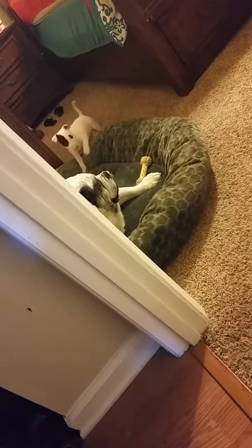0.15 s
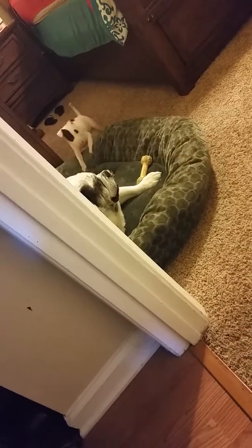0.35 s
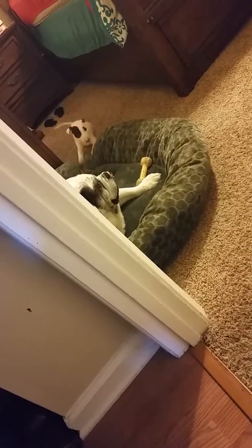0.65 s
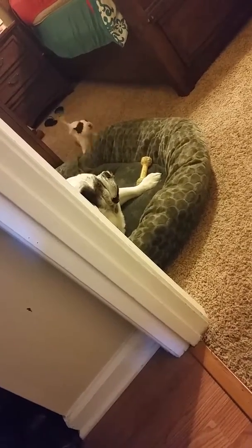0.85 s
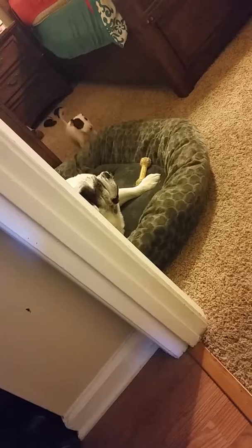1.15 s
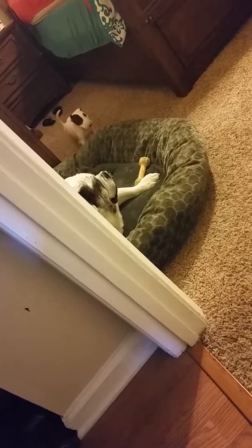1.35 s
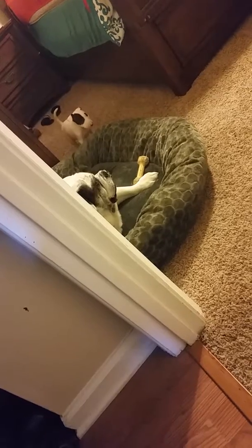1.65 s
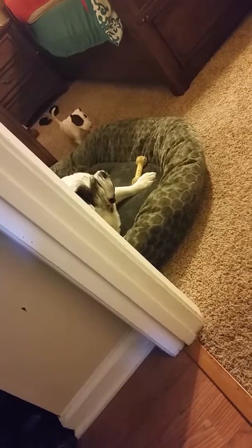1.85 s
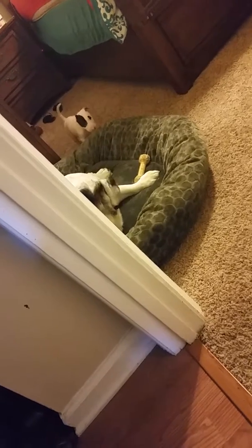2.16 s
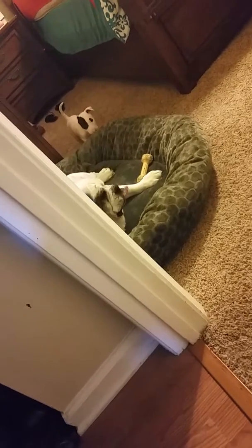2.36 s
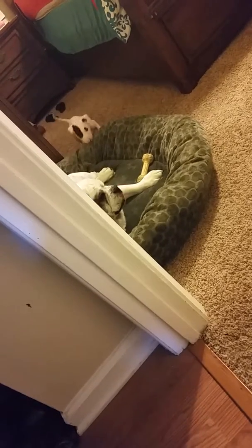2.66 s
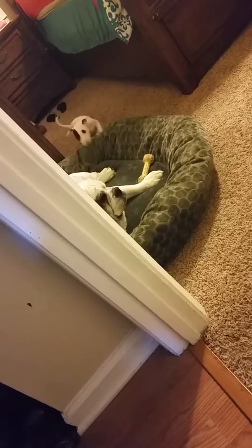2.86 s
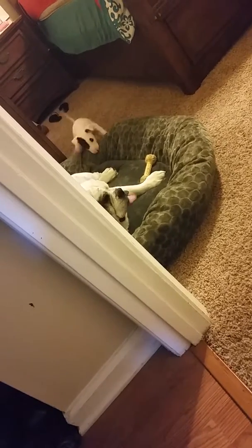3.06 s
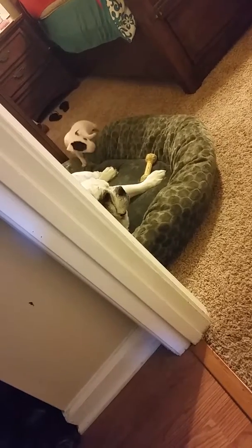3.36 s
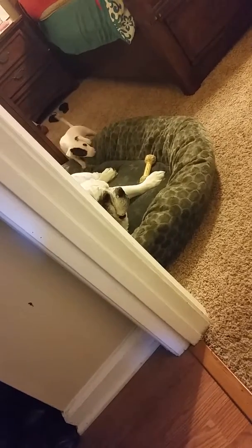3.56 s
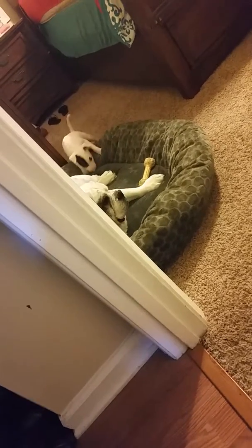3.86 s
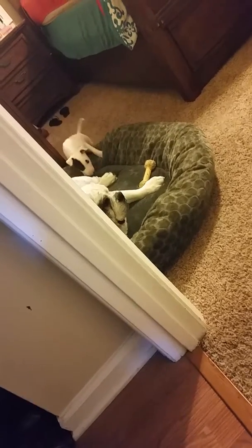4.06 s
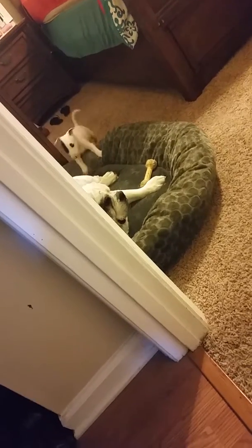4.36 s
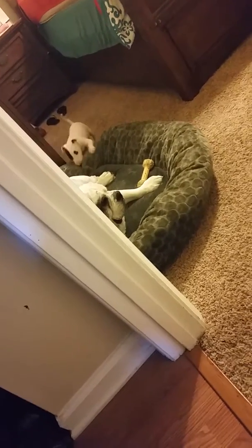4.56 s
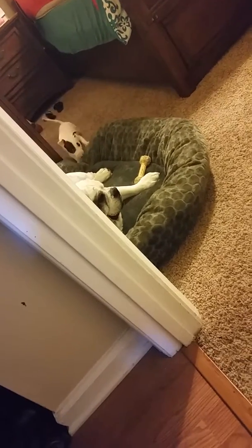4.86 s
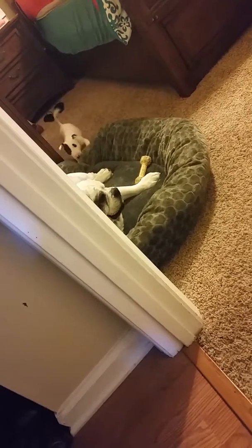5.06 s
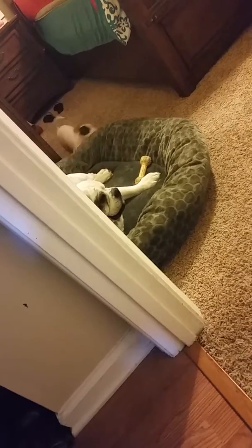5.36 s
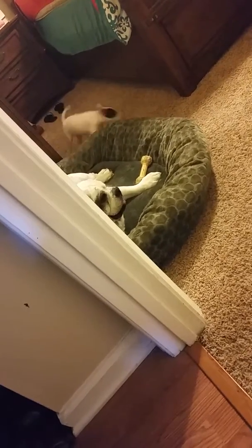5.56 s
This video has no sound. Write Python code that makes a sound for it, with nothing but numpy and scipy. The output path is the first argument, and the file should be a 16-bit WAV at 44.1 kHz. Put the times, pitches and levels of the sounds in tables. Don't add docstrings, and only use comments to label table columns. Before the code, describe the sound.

Inside a carpeted room, heard by phone from the doorway: a big dog's deep, rattling growl, strongest at first, thinning in the middle and rising again later. A puppy adds fluttering grumbles, toothy breath puffs, faint nose whistles and four brief yaps, the first brightest and highest. Soft paw thumps and knocks scatter through. Low house rumble and uneven hiss lie beneath; a hard woof begins as it stops.

```python
import sys
import numpy as np
from scipy import signal
from scipy.fft import rfft, irfft, next_fast_len
from scipy.io import wavfile
from scipy.ndimage import uniform_filter1d, map_coordinates

SR = 44100
rng = np.random.default_rng(int(sys.argv[2]) if len(sys.argv) > 2 else 0)


def volts_from_db(level):
    exponent = np.asarray(level, float) / 20
    return 10 ** exponent


def master(y):
    cut = np.clip(np.atleast_2d(y).T, -1, 1)
    pcm = np.round(cut * 32767)
    wavfile.write(sys.argv[1], SR, pcm.astype(np.int16))


N = 252428
TIME = np.arange(N) / SR
COARSE = 32

# (start [s], hold [s], effort [dB],
# mouth opening [dB])
GROWLS = [(0, 0.67, -34, -8.5), (.68, 0.19, -37, -5), (.95, 0.214, -46, 4.5), (1.17, 0.142, -62, 22.5),
          (1.5, 1, -57, -19), (2.12, 0.23, -39, -36), (2.4, 0.47, -47.5, -31), (2.7, 0.21, -49, -19),
          (2.95, 0.027, -48, 15.5), (3.25, 0.064, -64, 9), (3.55, 0.099, -62, -14.5),
          (3.85, 0.18, -53, -15.5), (4.17, 0.009, -37.5, -32.5), (4.32, 0.42, -36, -28),
          (4.62, 0.13, -37, -15), (4.85, 0.027, -29.5, -1.1), (5.0, 0.05, -37.5, -5),
          (5.19, 0.029, -41.5, 6), (5.3, 0.19, -34.5, -4), (5.5, 0.095, -41.5, -7.5),
          (5.64, 0.028, -41, -5.5)]
GROWL_RISE_DB_S, GROWL_SAG_DB_S, GROWL_FALL_DB_S = 199.5, -1.5, 180
# (time [s], fold rate [Hz], chest ring [dB])
GROWL_PITCH = [(0, 93.74, -2), (.7, 93.73, -0.5), (2.05, 95.85, 0.5), (2.25, 88.03, 2.5),
               (2.47, 85.92, -3.5), (2.55, 98.38, -3), (4.1, 107.8, 1.5), (4.35, 97.24, -1),
               (4.75, 97.13, -6), (5.05, 96.4, 7), (5.15, 95.5, 4), (5.55, 95.78, -6), (5.72, 98.4, 13)]
# (time [s], jitter [share])
FOLD_JITTER = [(0, .04), (.65, .04), (.75, .09), (2.0, .04), (2.45, .04), (2.6, .12), (5.72, .16)]
# (centre [Hz], width [Hz], level [dB])
CHEST_MODES = [(95, 34, 0)]
# (centre [Hz], width [Hz], level [dB])
THROAT_MODES = [(230, 15, 0), (345, 50, -27)]
# (centre [Hz], width [Hz], level [dB])
MOUTH_MODES = [(522, 70, -1.5), (625.7, 26, 2.5), (707, 96, -6), (1280, 86, -7.5), (1593, 92, -8),
               (2240, 420, -25)]
CHEST_BETWEEN_DB = -15
LIPS_PART_DB, THROAT_DB, THROAT_SHUT, THROAT_OPEN = -11, -11, 0.34, 1.326
# (first [s], last [s], period [s], first level [dB], last level [dB])
FLAP_RUNS = [(2.07, 2.218, 0.048, -47.5, -42.5), (2.272, 2.519, 0.061, -42, -61.5),
             (2.57, 2.715, 0.039, -40, -45.5), (2.797, 2.8, .05, -37.5, -51),
             (3.647, 3.75, 0.056, -50, -52), (3.825, 3.859, 0.045, -57.5, -54),
             (3.963, 4.041, 0.074, -46, -57)]
FLAP_SCATTER_DB, FLAP_SCATTER_S = 1.3, .003
# (time [s], peak [dB])
SINGLE_FLAPS = [(-.002, -27.5), (.051, -28.5), (.103, -26.5), (.155, -26), (.212, -31.5), (.265, -29),
                (.32, -29.5), (.367, -29), (.431, -30.5), (.48, -29), (.542, -28), (.59, -30), (.65, -29.5),
                (0.732, -35), (.78, -31), (4.093, -46), (4.152, -39.5), (4.265, -38), (4.318, -35.5),
                (4.361, -35), (4.412, -38), (4.453, -36), (4.497, -36.5), (4.552, -36.5), (4.598, -38.5),
                (4.644, -32.5), (4.678, -48), (4.711, -34.5), (4.78, -35.5)]
# (time [s], swell width [s], kick [dB])
FLAP_SHAPE = [(0, 0.022, -10), (.7, 0.016, -14), (2.4, 0.017, -7.5), (2.7, 0.0061, -11), (4, 0.0061, 1),
              (5.72, 0.0043, -10.5)]
# (time [s], peak [dB])
SMACKS = [(.14, -59.5), (0.171, -40.5), (0.224, -45.5), (0.3191, -42), (0.361, -46.5), (.434, -46),
          (0.458, -44), (.495, -44), (.507, -48), (.5307, -38.5), (0.569, -48.5), (.589, -37), (0.643, -46),
          (0.72, -47), (.771, -45)]
# (centre [Hz], width [Hz], level [dB])
SMACK_MODES = [(600, 58, 9), (1280, 70, 1), (1600, 80, -2), (2170, 95, -6.5)]
# (time [s], level [dB])
WOOF_SLAPS = [
    (5.6978, -26),
    (5.7052, -30),
    (5.7083, -19),
    (5.712, -20),
    (5.7155, -8),
    (5.7197, -4),
    (5.7231, -6),
]
# (centre [Hz], width [Hz], level [dB])
WOOF_MODES = [(168, 65, 5), (480, 20, -1.5), (908, 250, 4.5), (1800, 123, 11), (3970, 270, -15.5),
              (9200, 2600, -12.5)]

# (time [s], pitch [Hz], level [dB], noise share [0-1])
YAP_1 = [(.836, 1154, -32, 1), (.85, 1249, -14.5, 0.83), (.875, 1280, -19.5, 0.5), (.89, 1085, -19.5, 0.03),
         (.915, 914, -25.5, 0.25), (.95, 731, -29.5, .25), (.98, 611.5, -29.5, 0.5),
         (1.0, 545.5, -32.5, 0.15), (1.04, 481.5, -52.5, 0.2)]
# (time [s], pitch [Hz], level [dB], noise share [0-1])
YAP_1_DRONE = [(.823, 932, -56, .09), (.834, 945, -23, 0.0652), (.855, 1051, -26, 0.11),
               (.885, 1109, -16.5, 0.05), (.908, 1087, -15.5, .05), (.929, 1051, -15.5, .05),
               (.945, 1045, -28.5, 0.11), (.958, 1029, -45, 0.16)]
# (time [s], pitch [Hz], level [dB], noise share [0-1])
YAP_1_WHINE = [(.872, 1029, -41, 0.45), (.895, 1051, -36.5, .15), (.93, 1048, -31.5, 0.17),
               (.955, 1059, -34, .3), (1.0, 1080, -38, 0.5), (1.37, 1084, -59, 0.66)]
# (time [s], pitch [Hz], level [dB], noise share [0-1])
YAP_2 = [(2.866, 541.2, -74, .05), (2.874, 600, -62, 0.0394), (2.884, 740.2, -52, .04),
         (2.898, 883, -52.5, 0.028), (2.911, 980.6, -43, 0.059), (2.921, 1015, -29, .2),
         (2.932, 930, -29.5, .62), (2.952, 753.8, -31.5, 0.81), (2.98, 525, -34.5, .4),
         (3.03, 300, -61.5, 0.26)]
# (time [s], pitch [Hz], level [dB], noise share [0-1])
YAP_2_DRONE = [(2.915, 995.5, -39.5, 0.13), (2.935, 1019, -33.5, 0.32), (2.955, 989, -40.5, 0.18),
               (2.978, 1023, -36.5, 0.38), (2.99, 1058, -46, 0.39), (3.05, 1130, -57, 0.76)]
# (time [s], pitch [Hz], level [dB], noise share [0-1])
YAP_3 = [(4.778, 497.7, -55, 0.29), (4.802, 583.4, -32, 0.056), (4.813, 638, -25, 0.044),
         (4.838, 696.7, -23, .08), (4.847, 686.7, -21, .2), (4.856, 662, -27, 0.85), (4.9, 600, -34, 0.9),
         (4.935, 526, -63, 0.72)]
# (time [s], pitch [Hz], level [dB], noise share [0-1])
YAP_4 = [(5.15, 471.8, -52, 0.29), (5.172, 508.1, -49.5, 0.25), (5.195, 557.9, -45, 0.59),
         (5.215, 519, -27, 0.55), (5.235, 532.3, -31.5, .35), (5.26, 533, -36, .4),
         (5.28, 518, -43.5, 0.78), (5.31, 460, -65.5, 0.34)]
# (frequency [Hz], gain [dB])
JAWS_1 = [(200, -23), (350, -12.5), (700, -18.5), (1070, -2.5), (1390, -1), (1800, -10.5), (2150, -3),
          (2800, -17), (3400, -14), (3800, -4.5), (4300, -7), (4800, -17), (6230, -39), (10200, -49),
          (13500, -23.5), (15700, -32)]
# (frequency [Hz], gain [dB])
JAWS_1_CLOSING = [(200, -15.5), (350, -11.5), (700, -18), (1070, 1.5), (1390, -9), (1800, -9), (2180, -12),
                  (2550, -9.5), (2950, -9.5), (3380, -8), (3650, -19), (4300, -27.5), (5150, -23.5),
                  (6230, -38), (13500, -29.5), (15700, -35.5)]
# (frequency [Hz], gain [dB])
JAWS_2_OPENING = [(200, -25), (600, -5.5), (1000, -9), (1500, 2.5), (2000, -1), (2800, -2.5), (3400, -12),
                  (4050, 1), (4600, -10), (6000, -26.5), (10000, -34), (15700, -28)]
# (frequency [Hz], gain [dB])
JAWS_2 = [(200, -37.5), (500, -9.5), (750, -18), (1050, 9), (1300, 6), (1860, -10.5), (2300, -9),
          (2900, -5), (3400, -10), (4050, 0), (4500, -1), (5200, -20), (6000, -22.5), (10000, -29),
          (15700, -23.5)]
# (frequency [Hz], gain [dB])
JAWS_3_OPENING = [(260, -39), (560, -29), (840, -19), (1150, -8.5), (1350, 4), (1700, -9.5), (2250, -4),
                  (2500, -8), (2900, -23.5), (4240, -0.5), (5700, -32), (8520, -48), (15700, -44.5)]
# (frequency [Hz], gain [dB])
JAWS_3 = [(260, -42.5), (450, -27.5), (692, -14), (840, -39.5), (1000, -17), (1270, 4.5), (1410, 3),
          (1700, 15.5), (2050, -5), (2400, -6), (3800, 2), (4240, -19), (5700, -31), (7230, -42),
          (8520, -28), (15700, -37)]
# (frequency [Hz], gain [dB])
JAWS_4 = [(240, -32), (400, -4), (520, -9.5), (798, -50), (1020, -27), (1200, -9), (1620, 4.5),
          (1950, -7.5), (2300, -22), (2850, -15), (3400, -14), (3940, -10.5), (4600, -22), (5520, -41),
          (7050, -50), (8610, -23.5), (9440, -42), (15700, -38.5)]
# half-pitch share first, last; brightness [dB/octave] first, last; fraying
SLACK_1, SLACK_2, SLACK_3, SLACK_4 = (0, 3.5, 0, -1, 1), (0, 0.13, 1.9, -2, .4), (0.52, 8, -1.6, 3, 3.5), (1, 6, 2.5, -1, 4.5)
SLACK_DRONE_1, SLACK_WHINE_1 = (0, 0, 8, -7, 4), (0, 0, -1, -8.5, 8)
SLACK_DRONE_2 = (0, -3.5, 1, -5, 18)
DULLS_PER_DB = 0.46
FRAY_FROM_HZ = 2300
THROB_S, THROB_HZ, THROB_DEPTH = .89, 54, 0.78
YAP_WET_DB = [
    -3,
    -7,
    -6.5,
    -7.5,
]
# (start [s], hold [s], level [dB])
GRUMBLES = [(.03, 0.072, -39), (.215, 0.01, -37.5), (.36, 0.06, -44.5), (.5, 0.056, -40.5),
            (.72, 0.12, -41), (1.05, 0.3, -35.5), (1.55, 0.87, -67), (2.4, 0.12, -58), (2.6, .015, -48.5),
            (2.88, 0.086, -50), (3.02, 0.027, -41.5), (3.245, 0.055, -42), (3.66, 0.06, -57.5),
            (3.85, 0.025, -44), (4.16, 0.02, -44), (4.33, .04, -58), (4.58, 0.31, -44.5), (4.9, 0.038, -33),
            (5.0, 0.17, -45), (5.27, 0.11, -37), (5.455, 0.034, -34), (5.6, 0.015, -52.5),
            (5.715, 0.024, -33)]
GRUMBLE_RISE_DB_S, GRUMBLE_SAG_DB_S, GRUMBLE_FALL_DB_S = 251.5, 17.5, 332.5
# (centre [Hz], width [Hz], level [dB])
PUPPY_MODES = [(143, 43, 5), (257, 220, -3), (460, 120, -6.5), (652.4, 100, -50)]
# (start [s], hold [s], level [dB])
PUFFS = [(.03, 0.53, -75.5), (.67, 0.028, -63.5), (.875, 0.11, -41), (1.07, 0.25, -59.5),
         (2.775, 0.02, -79.5), (2.93, 0.024, -52.5), (3.25, 0.05, -73.5), (4.6, .2, -83.5),
         (4.86, .005, -48), (5.03, 0.15, -71.5), (5.23, 0.048, -60.5), (5.36, 0.12, -65.5),
         (5.72, .01, -59)]
PUFF_RISE_DB_S, PUFF_SAG_DB_S, PUFF_FALL_DB_S = 547, 26, 190.5
# (frequency [Hz], density [dB per Hz])
TEETH = [(1060, -29), (1800, -2), (2200, -6), (2470, -11.5), (2750, -9), (3650, -11), (4960, -5.5),
         (5680, -14), (6390, -8.5), (7190, -18.5), (8540, -6), (10600, -22.5), (13200, -8.5), (15700, -31)]
# (start [s], hold [s], level [dB], first pitch [Hz], last pitch [Hz])
WHISTLES = [(0.014, 0.33, -70.5, 8220, 8500), (0.414, 0.7, -76, 7400, 7450), (0.667, .1, -66, 8780, 9100),
            (0.967, .06, -47, 5397, 5104), (1.109, 0.18, -51.5, 5075, 4880),
            (1.128, 0.064, -56, 6540, 6510), (1.087, 0.27, -71, 8650, 8650),
            (3.237, 0.07, -74.5, 8630, 8600), (5.2, 0.058, -60.5, 8550, 8760),
            (5.355, .06, -59.5, 8700, 8550), (4.595, .08, -71, 2220, 2294)]
WHISTLE_RISE_DB_S, WHISTLE_SAG_DB_S, WHISTLE_FALL_DB_S, WHISTLE_BLUR_HZ = 502, 23, 248.5, 354
# (time [s],
# peak [dB], ring [Hz], T60 [s])
TAPS = [(-.0135, -14, 90, 0.053), (1.07, -26, 73.6, 0.055), (2.86, -47, 62.1, 0.15),
        (2.715, -21, 255.6, 0.0088), (3.692, -41, 223.4, 0.031), (4.141, -50, 332, 0.044),
        (4.181, -21, 417, 0.0079), (4.183, -21.5, 1091, 0.0019), (4.1825, -53, 1800, 0.0035),
        (4.704, -17.5, 294, 0.012), (4.848, -8, 99.7, 0.024), (5.17, -40, 1600, 0.025),
        (5.184, -41, 1660, 0.023), (5.193, -34, 1710, .025), (5.245, -47.5, 447, 0.21),
        (5.43, -30, 42.12, 0.062), (5.519, -54, 1840, 0.027), (5.565, -51.5, 1800, 0.032),
        (5.603, -53, 1810, 0.039), (5.661, -8.5, 95, 0.019), (5.664, -38.5, 1100, 0.019),
        (5.662, -31, 480, .012), (5.71, -22, 187, 0.065)]

# (frequency [Hz], T60 [s])
ROOM_T60 = [(100, 0.96), (1000, 0.4), (4000, 0.39), (12000, 0.45)]
# (frequency [Hz], left over right [dB])
PORTS = [(30, -1), (100, .6), (200, 3), (500, 4), (1100, 7.5), (2300, 10), (3200, 8), (4000, 30),
         (6000, 30), (9000, 12), (12000, 7), (15500, 3)]
# (frequency [Hz], density [dB per Hz])
HISS = [(210, -49), (350, -8), (600, -18.5), (950, -20.5), (1230, -11), (1500, -18.5), (2400, -36),
        (3300, -32), (4100, -17), (4700, -13), (5300, -28), (6100, -44), (11000, -39.5), (15500, -35.5)]
# (frequency [Hz], density [dB per Hz])
RUMBLE = [(12, -31.5), (20, -12.5), (27, -6), (45, 0), (114, 3.5), (147, -7.5), (387, -13), (437, -6),
          (500, -25), (650, -51), (1100, -120)]
# (frequency [Hz], left-right likeness [0-1])
AIR_ALIKE = [(30, 1), (80, .9), (300, 0.72), (1000, 0.0066)]
# (frequency [Hz], left over right [dB])
AIR_PORTS = [(60, -3), (110, 1), (200, 0), (380, 3), (700, -2.5), (1290, 8), (2380, -4.5), (4400, 26.5),
             (8120, 7.5), (15000, -2)]
HISS_DB, HISS_FOLLOWS, HISS_LAG_S = -48, 0.61, 0.21


def big_dog():
    breaths = pushes(GROWLS, GROWL_RISE_DB_S, GROWL_SAG_DB_S, GROWL_FALL_DB_S)
    steady = full(breaths.sum(axis=0))
    mouth_db = full(np.transpose(GROWLS)[3] @ breaths / breaths.sum(axis=0))
    opened_db = mouth_db - LIPS_PART_DB
    throat_db = THROAT_DB + np.maximum(-THROAT_SHUT * opened_db, THROAT_OPEN * opened_db)
    mouth_gain, throat_gain = volts_from_db(mouth_db), volts_from_db(throat_db)

    pitch_hz, chest_db = curves(GROWL_PITCH)
    clean = folds(pitch_hz, jitter=curves(FOLD_JITTER)[0], scatter_db=1, breath=.04)
    rough = folds(pitch_hz, jitter=.08, scatter_db=2.5, breath=.35)
    loose = folds(pitch_hz, jitter=.4, scatter_db=3, breath=.7)

    slaps = np.flatnonzero(clean > 8)
    swells, kicks = 0, np.zeros(N)
    for s, db in flaps():
        width_s, kick_db = curves(FLAP_SHAPE, s)
        onset_s = s - .008
        swells = swells + volts_from_db(db - 6) * np.exp(-((TIME[::COARSE] - onset_s) / width_s) ** 2)
        nearest = slaps[np.abs(slaps - onset_s * SR).argmin()]
        kicks[nearest] = volts_from_db(db + kick_db)
    swells = full(swells)

    effort = volts_from_db(-11) * steady + swells
    lagging = (effort + uniform_filter1d(effort, size=2400)) / 2
    mouth = voiced(rough, lagging * mouth_gain, MOUTH_MODES, 3000, .08 * kicks * mouth_gain)
    throat = voiced(loose, volts_from_db(-1.5) * effort * throat_gain, THROAT_MODES, 650, volts_from_db(4.5) * kicks * throat_gain)
    chest_gain = (volts_from_db(CHEST_BETWEEN_DB) * steady + swells) * volts_from_db(chest_db + 2.0)
    chest = voiced(clean, chest_gain, CHEST_MODES, 380, .7 * kicks)
    return chest + throat + mouth


def flaps():
    rows = []
    for first_s, last_s, period_s, first_db, last_db in FLAP_RUNS:
        for s in np.arange(first_s, last_s + period_s / 2, period_s):
            rows.append((s, np.interp(s, [first_s, last_s], [first_db, last_db])))
    scatter = rng.standard_normal((len(rows), 2)) * [FLAP_SCATTER_S, FLAP_SCATTER_DB]
    return np.vstack([rows + scatter, SINGLE_FLAPS])


def smacks():
    clicks = impulses(SMACKS, 41.0)
    return filtered(clicks, lambda f: modes(SMACK_MODES)(f) / (1 + 1j * f / 3500) ** 4)


def woof():
    slaps = -impulses(WOOF_SLAPS, 25.0)
    return filtered(slaps, lambda f: modes(WOOF_MODES)(f) / (1 + 1j * f / 2600) ** 2)


def yap(rows, jaws, slack, closing=None):
    closing = jaws if closing is None else closing
    half_first, half_last, bright_first, bright_last, fraying = slack
    a, b = round(rows[0][0] * SR), round(rows[-1][0] * SR)
    size = b - a
    pitch_hz, level_db, noise = curves(rows, TIME[a:b])
    pitch_hz = pitch_hz * (1 + .008 * wobble(150, size))
    done = np.linspace(0, 1, size)
    half = half_first + (half_last - half_first) * done ** 6
    bright_db = bright_first + (bright_last - bright_first) * done
    bright_db = bright_db - DULLS_PER_DB * (level_db.max() - level_db)

    k = np.arange(1, 61)[:, None] / 2
    hz = k * pitch_hz
    tilt_db = bright_db * np.log2(np.clip(hz / 1000, .5, 5))
    jaws_db = (1 - done) * along(jaws, hz) + done * along(closing, hz)
    gains = volts_from_db(jaws_db + tilt_db) * np.where(k % 1, half, 1)

    fray = fraying * np.clip(hz / FRAY_FROM_HZ - 1, 0, 2)
    blur = np.clip(2.3 * k, 0, 3) * noise + fray / (1 + fray)
    flutter = 1 / (1 + fray) + blur * np.array([wobble(400, size) for _ in k])
    turns = k * np.cumsum(pitch_hz) / SR + rng.random(k.shape)
    tone = np.sum(gains * flutter * np.sin(2 * np.pi * turns), axis=0)
    tone /= np.sqrt(np.sum(gains ** 2, axis=0) / 2 + 1e-9)

    hiss = rng.standard_normal(size)
    early, late = filtered(hiss, lambda f: volts_from_db([along(jaws, f), along(closing, f)]) * (f > 1020))
    rasp = (1 - done) * unit(early) + done * unit(late)
    out = np.zeros(N)
    out[a:b] = volts_from_db(level_db + 1.1 * wobble(90, size)) * ((1 - noise) * tone + noise * rasp)
    return out


def throb():
    since_s = TIME - THROB_S
    depth = THROB_DEPTH * np.clip((since_s + 0.015) / 0.025, 0, 1)
    return 1 + depth * np.cos(2 * np.pi * THROB_HZ * since_s)


def puppy_grumble():
    level = full(pushes(GRUMBLES, GRUMBLE_RISE_DB_S, GRUMBLE_SAG_DB_S, GRUMBLE_FALL_DB_S).sum(axis=0))
    drive = folds(158 + 6 * wobble(5), jitter=.1, scatter_db=3, breath=.3)
    return voiced(drive, level * volts_from_db(-1.5 + 3 * wobble(35)), PUPPY_MODES, 1300)


def panting():
    hiss = filtered(rng.standard_normal(N), lambda f: volts_from_db(along(TEETH, f)))
    level = full(pushes(PUFFS, PUFF_RISE_DB_S, PUFF_SAG_DB_S, PUFF_FALL_DB_S).sum(axis=0))
    return unit(hiss) * level * volts_from_db(3.4 * wobble(37))


def whistles():
    out = np.zeros(N)
    gains = pushes(WHISTLES, WHISTLE_RISE_DB_S, WHISTLE_SAG_DB_S, WHISTLE_FALL_DB_S)
    for (s, hold_s, _, first_hz, last_hz), gain in zip(WHISTLES, gains):
        pitch_hz = np.interp(TIME, [s, s + hold_s], [first_hz, last_hz])
        blur = np.resize(wobble(WHISTLE_BLUR_HZ, size=SR), N)
        out += full(gain) * blur * np.sin(2 * np.pi * np.cumsum(pitch_hz) / SR)
    return out


def taps():
    out = np.zeros(N + 2 * SR)
    after = TIME[:SR // 4]
    for s, db, hz, t60 in TAPS:
        rise = (1 - np.exp(-hz * after)) ** 2
        start = round((s + 1) * SR)
        out[start:start + len(after)] += volts_from_db(db + 11.5 - 60 * after / t60) * np.sin(2 * np.pi * hz * after) * rise
    return out[SR:][:N]


def room(x, wet_db):
    hz, t, z = signal.stft(rng.standard_normal((2, SR)), SR, nperseg=256)
    z = np.where(hz[:, None] < 100, .8 * z[0] + .6 * z, z)
    decay = volts_from_db(-60 * t / along(ROOM_T60, hz)[:, None])
    tail = signal.istft(z * decay, SR, nperseg=256)[1]
    tail = tail / np.linalg.norm(tail[0])
    delayed = np.pad(np.atleast_2d(x).mean(axis=0), (180, 0))
    return x + volts_from_db(wet_db) * signal.fftconvolve(delayed[None], tail, axes=1)[:, :N]


def ports(pair, balance, lead_s):
    def response(f):
        right = np.exp(-2j * np.pi * f * lead_s) * volts_from_db(-along(balance, f))
        return np.array([np.ones(len(f)), right])
    return filtered(pair, response)


def air(around):
    loud_db = 10 * np.log10(np.abs(uniform_filter1d(around ** 2, size=2000)) + 1e-7)
    keep = np.exp(-1 / (HISS_LAG_S * SR))
    followed_db = signal.lfilter([1 - keep], [1, -keep], loud_db - loud_db[0]) + loud_db[0]
    level_db = HISS_DB + HISS_FOLLOWS * followed_db
    hiss = rush(HISS)
    band = filtered(hiss[0], lambda f: (f > 4000) & (f < 5200))
    rumble = unit(rush(RUMBLE)) * volts_from_db(-64.5 + .45 * (level_db + 87) + wobble(6))
    return ports(hiss / np.std(band) * volts_from_db(level_db + 7.0) + rumble, AIR_PORTS, lead_s=0)


def rush(spectrum):
    def response(f):
        turn = np.arccos(np.clip(along(AIR_ALIKE, f), -1, 1)) / 2
        return volts_from_db(along(spectrum, f)) * [np.cos(turn), np.sin(turn)]
    mid, side = filtered(rng.standard_normal((2, N)), response)
    return np.array([mid + side, mid - side])


def folds(pitch_hz, jitter, scatter_db, breath):
    turns = np.cumsum(pitch_hz * (1 + jitter * wobble(60))) / SR
    closures = np.diff(np.floor(turns), prepend=0) > 0
    slaps = unit(closures * volts_from_db(scatter_db * rng.standard_normal(N)))
    puffs = unit(np.exp(-3 * (turns % 1)) * rng.standard_normal(N))
    return np.sqrt(1 - breath) * slaps + np.sqrt(breath) * puffs


def voiced(drive, gain, body, top_hz, kicks=0):
    def shape(f):
        low_cut = ((1j * f / 50) / (1 + 1j * f / 50)) ** 2
        return modes(body)(f) * low_cut / (1 + 1j * f / top_hz) ** 4
    ring = np.abs(filtered(np.eye(1, SR)[0], shape)).max()
    return filtered(drive * gain / np.std(filtered(drive, shape)) + kicks / ring, shape)


def modes(table):
    def response(f):
        total = 0
        for k, (c, w, db) in enumerate(table):
            total = total + (-1) ** k * volts_from_db(db) * 1j * f * w / (c * c - f * f + 1j * f * w)
        return total
    return response


def pushes(rows, rise_db_s, sag_db_s, fall_db_s):
    s, hold_s, level_db = np.transpose(rows)[:3, :, None]
    t = TIME[::COARSE] - s
    rise_db = rise_db_s * np.clip(-t, 0, None)
    sag_db = sag_db_s * np.clip(t, 0, hold_s)
    fall_db = fall_db_s * np.clip(t - hold_s, 0, None)
    return volts_from_db(level_db - rise_db - sag_db - fall_db) + 1e-9


def impulses(rows, gain_db):
    s, db = np.transpose(rows)
    blows = np.zeros(N)
    blows[np.round(s * SR).astype(int)] = volts_from_db(db + gain_db)
    return blows


def full(x):
    return np.interp(TIME, TIME[::COARSE], x)


def curves(rows, t=TIME):
    s, *cols = np.transpose(rows)
    return [np.interp(t, s, c) for c in cols]


def along(points, hz):
    f, v = np.transpose(points)
    return np.interp(np.log(hz + 1), np.log(f + 1), v)


def wobble(rate, size=N):
    knots = rng.standard_normal(int(size * rate / SR) + 4)
    return map_coordinates(knots, [np.arange(size) * rate / SR])


def filtered(x, response):
    n = x.shape[-1]
    m = next_fast_len(n + SR // 2)
    return irfft(rfft(x, m) * response(np.fft.rfftfreq(m, 1 / SR)), m)[..., :n]


def unit(x):
    return x / np.sqrt(np.mean(x ** 2) + 1e-20)


def scene():
    big = room(big_dog() + smacks() + woof() * volts_from_db([[-1.5], [1.5]]), wet_db=-12)
    small = room(puppy_grumble() + taps() + volts_from_db(4.0) * whistles(), wet_db=-21.5)
    first = yap(YAP_1, JAWS_1, SLACK_1, JAWS_1_CLOSING)
    first += throb() * yap(YAP_1_DRONE, JAWS_1, SLACK_DRONE_1, JAWS_1_CLOSING)
    first += yap(YAP_1_WHINE, JAWS_1_CLOSING, SLACK_WHINE_1)
    second = yap(YAP_2, JAWS_2_OPENING, SLACK_2, JAWS_2) + yap(YAP_2_DRONE, JAWS_2, SLACK_DRONE_2)
    third = yap(YAP_3, JAWS_3_OPENING, SLACK_3, JAWS_3)
    fourth = yap(YAP_4, JAWS_4, SLACK_4)
    calls = room(panting(), wet_db=-3.5)
    for call, wet_db in zip([first, second, third, fourth], YAP_WET_DB):
        calls = calls + room(call, wet_db)
    dogs = ports(big + small + volts_from_db(3.0) * calls, PORTS, lead_s=.0003)
    return dogs + air(dogs[0])


def roll_off(x):
    return signal.sosfilt(signal.butter(12, 15810, fs=SR, output="sos"), x)


def record(dry):
    return roll_off(dry)


dry = scene()
out = record(dry)
master(out)
```